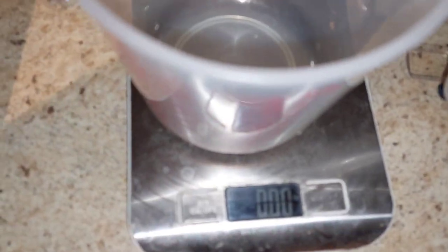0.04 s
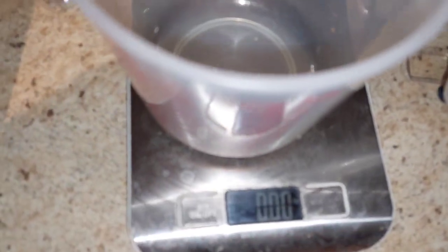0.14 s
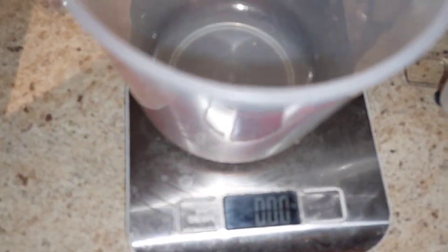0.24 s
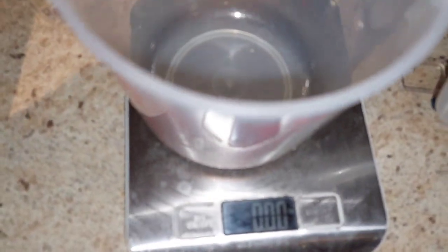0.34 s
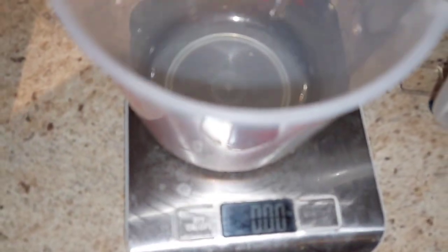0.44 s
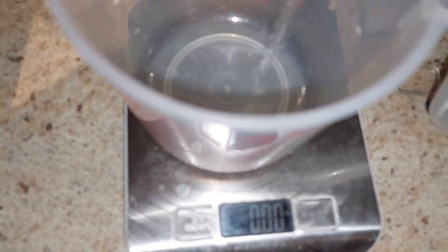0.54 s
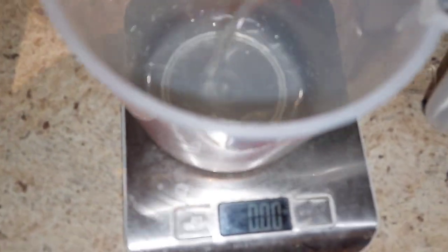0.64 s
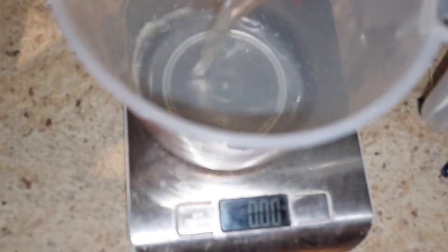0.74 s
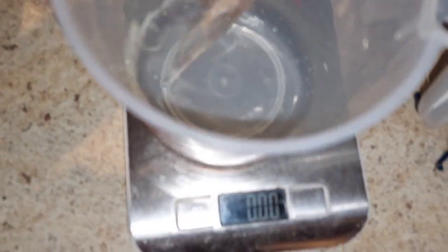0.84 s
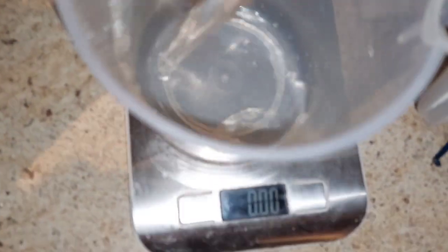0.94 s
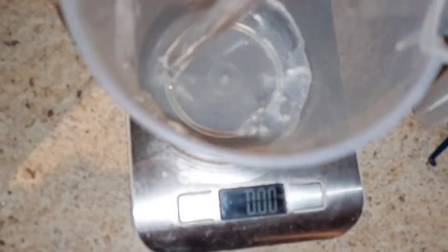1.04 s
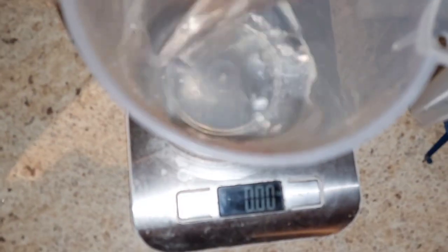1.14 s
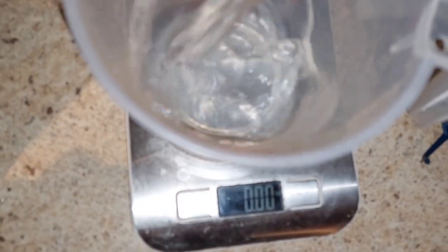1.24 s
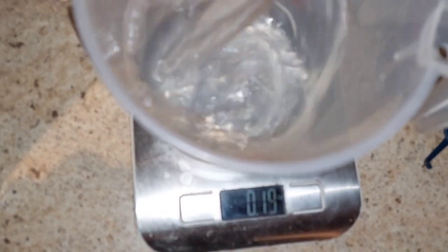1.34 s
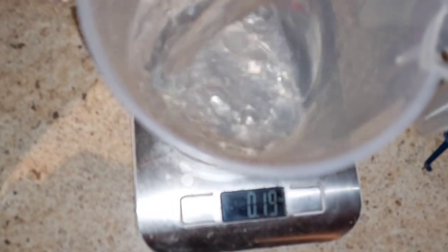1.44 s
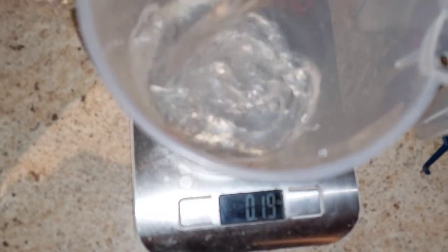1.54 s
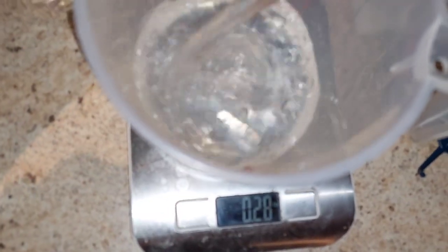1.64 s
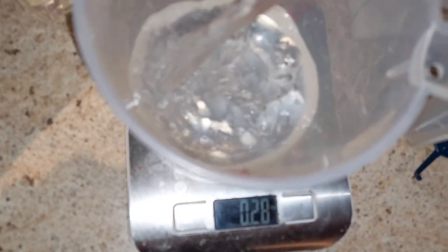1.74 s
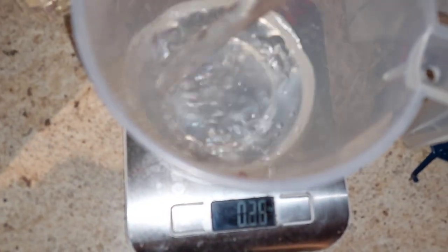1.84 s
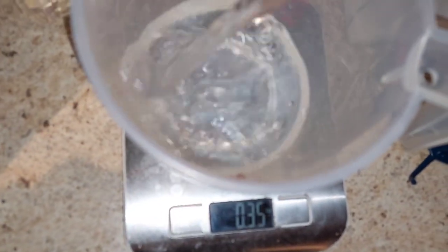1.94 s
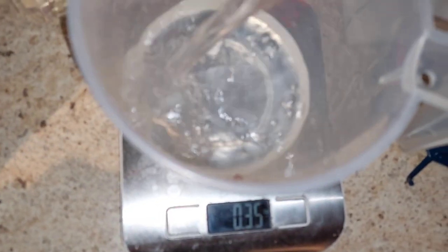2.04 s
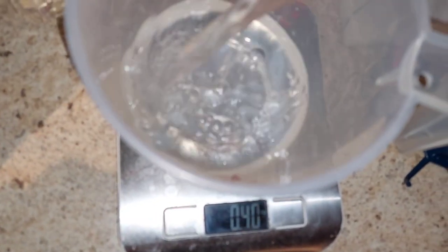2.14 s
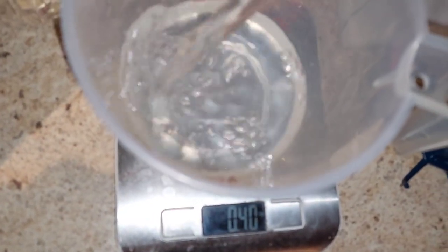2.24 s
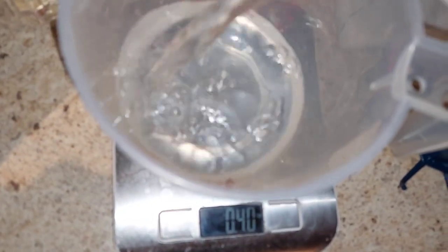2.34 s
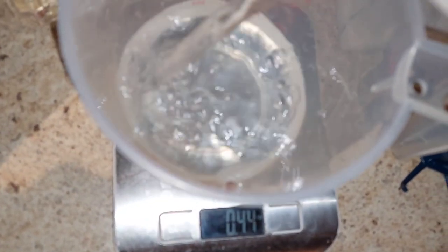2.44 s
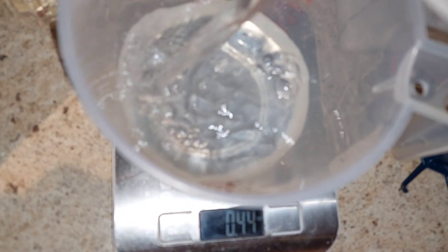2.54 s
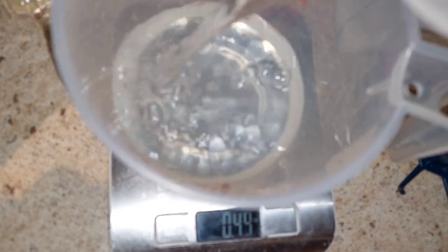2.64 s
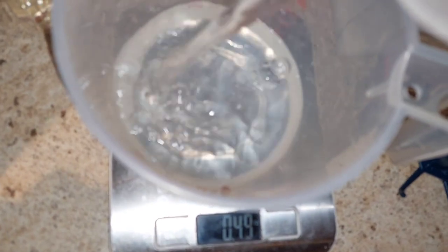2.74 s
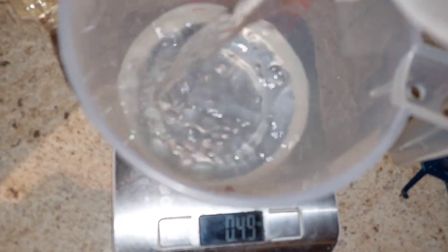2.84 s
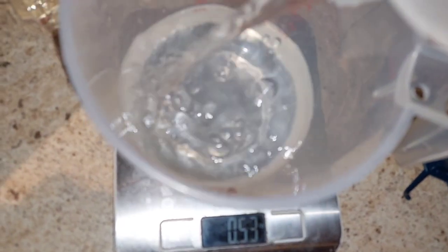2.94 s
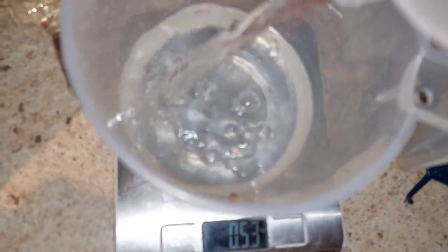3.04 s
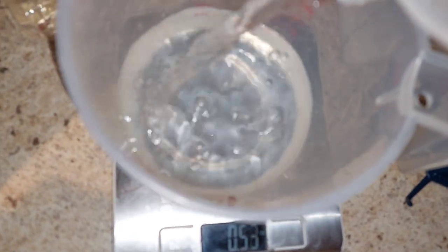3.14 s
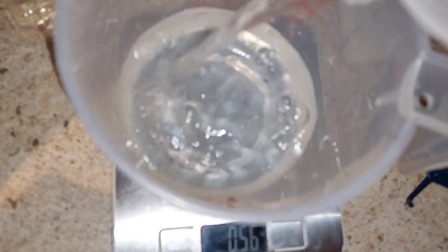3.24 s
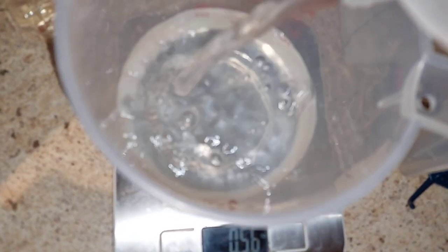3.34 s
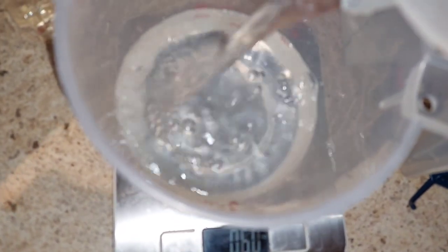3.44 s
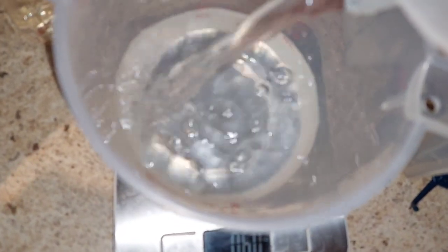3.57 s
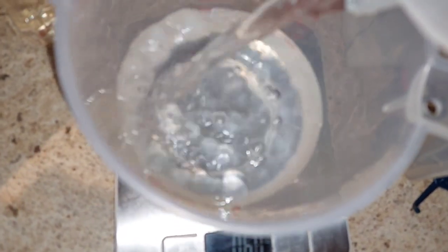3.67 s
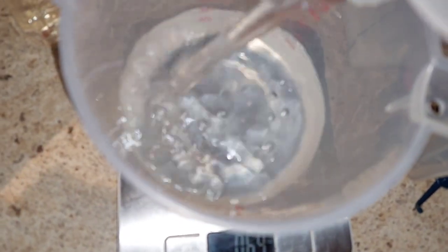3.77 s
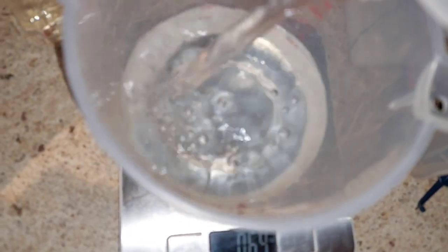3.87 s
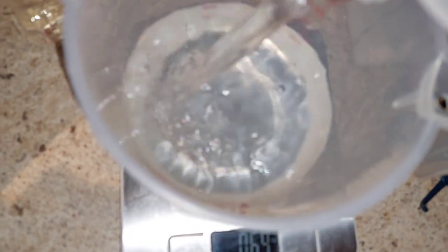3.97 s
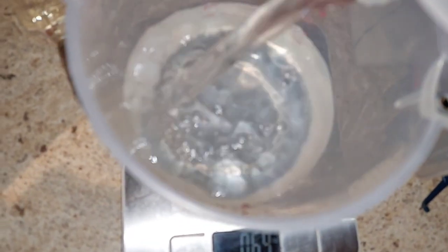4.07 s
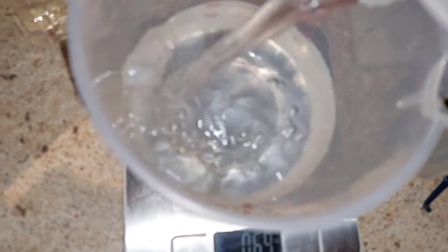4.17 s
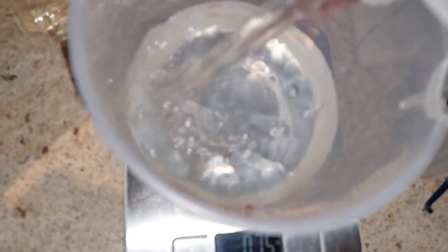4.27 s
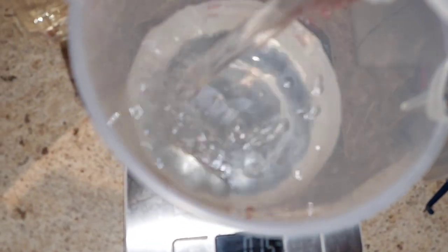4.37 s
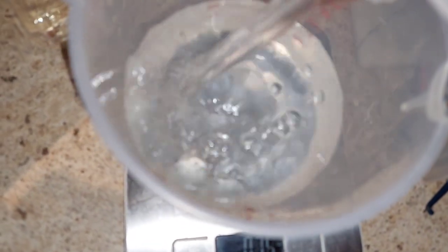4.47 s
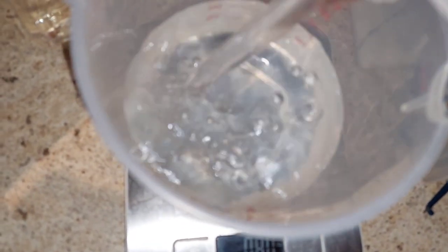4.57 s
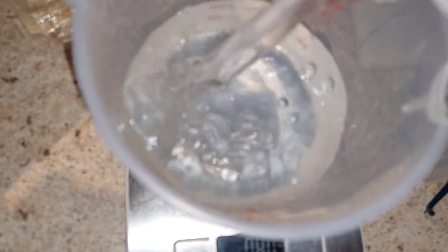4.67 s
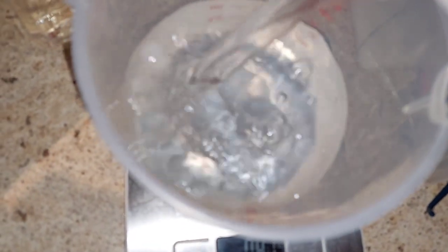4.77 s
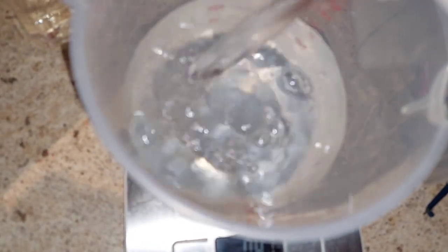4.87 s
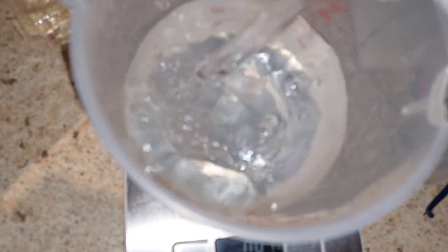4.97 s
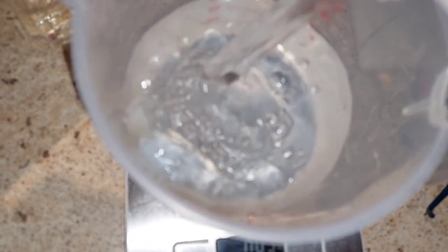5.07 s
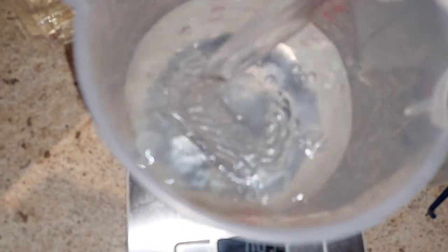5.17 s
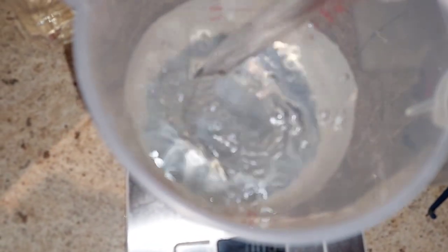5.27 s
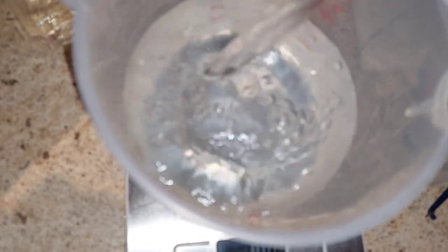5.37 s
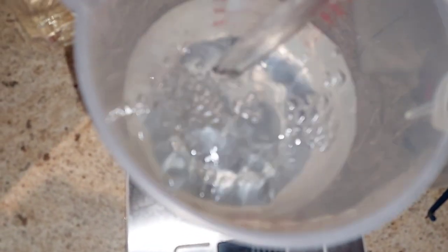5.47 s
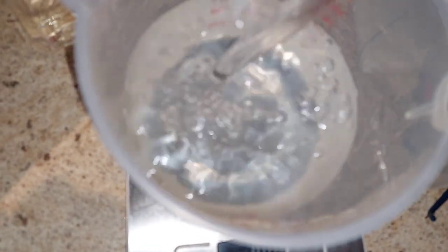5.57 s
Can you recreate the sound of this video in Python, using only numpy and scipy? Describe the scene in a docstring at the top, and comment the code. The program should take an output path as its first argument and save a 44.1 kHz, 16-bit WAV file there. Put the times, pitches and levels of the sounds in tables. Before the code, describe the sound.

Water drops rap on a plastic jug's bare base, then a stream pours in with a burst of splashing, a round gulp, and bubbly gurgling over faint hum.

```python
"""Water poured into a plastic jug

Drops rap on the bare base (damped modes), then a stream gurgles, splashes and sprays (swarms of ringing
bubbles over filtered noise). Glugs, sloshes and a big gulp (swelling, dying sines with noise slaps) stand out;
droplets tick and spatter (short pings, noise bursts). The water echoes in the jug and the room (decaying noise
tails). A motor hums (wavering sines) over room air (shaped noise)."""
import sys
import numpy as np
from scipy import signal
from scipy.fft import rfft, irfft
from scipy.io import wavfile
from scipy.ndimage import uniform_filter1d

SR = 44100
rng = np.random.default_rng(int(sys.argv[2]) if len(sys.argv) > 2 else 0)


def wav_out(sig):
    """Save sig, one row per channel (or a flat mono array), as 16-bit PCM at SR to the path in sys.argv[1]."""
    wavfile.write(sys.argv[1], SR, np.round(np.clip(np.atleast_2d(sig).T, -1, 1) * 32767).astype(np.int16))


N = 247401
TIME = np.arange(N) / SR

# motor partials: (frequency [Hz], level [dB])
HUM_PARTIALS = [(117.8, -55.5), (176.5, -69.5), (249.5, -62.5), (270.3, -71), (294, -69), (414.2, -76)]
# motor's strongest overtone: (time [s], level [dB])
DRONE_LEVEL = [(0.0, -55.5), (2.2, -53.5), (3.5, -57.5), (4.3, -72), (4.62, -62.5), (5.61, -56)]
# room air spectrum: (frequency [Hz], relative level [dB])
AIR_SPECTRUM = [(25, -17), (45, -11), (62, -0.5), (140, -0.5), (170, 3), (200, -4), (260, 8.5), (320, 5),
                (400, -4), (490, -0.5), (600, -14.5), (850, -17.5), (1300, -32), (3000, -37.5), (5800, -44),
                (7500, -37.5), (15000, -43.5)]
# hiss before the first drops: (centre [Hz], width [Hz], level [dB])
FIRST_HISS_BANDS = [(1840, 310, -77), (5030, 920, -81)]
# stream's large, middling and tiny bubbles: (time [s], gurgle [dB], splash [dB], spray [dB])
POUR_LEVELS = [(0.6, -73, -91, -77), (0.69, -62, -74, -68), (0.72, -64, -63, -68), (0.81, -72, -69, -68),
               (0.88, -84, -76, -74), (1.05, -86, -83, -75), (1.18, -75, -75.5, -69.5),
               (1.23, -74, -66.5, -59.5), (1.275, -66, -65, -64), (1.3, -62, -55, -55),
               (1.33, -57, -49.5, -45), (1.58, -58, -51, -48.5), (1.72, -49.5, -49.5, -56.5),
               (1.785, -61.5, -57.5, -56.5), (1.9, -70, -57, -62), (2.09, -58.5, -57.5, -60.5),
               (2.16, -53.5, -59, -64), (2.24, -57.5, -57.5, -65.5), (2.31, -68, -62, -65),
               (2.46, -58.5, -62, -74), (2.54, -61.5, -63.5, -68), (2.6, -59, -59, -65.5),
               (2.72, -67.5, -59.5, -63.5), (3.1, -67, -63, -71), (3.65, -65, -64, -65.5),
               (4.0, -62, -63, -67.5), (4.4, -65.5, -65, -68), (4.8, -61, -60.5, -65),
               (5.13, -69.5, -65.5, -66.5), (5.61, -66, -68, -64)]
# stream plunging harder or thinning: (time [s], level relative to the steady pour [dB])
STREAM_SURGES = [(2.93, 2), (3.06, -2), (3.339, 3), (3.62, 5.5), (3.85, -2.5), (3.99, -5.5), (4.47, 1),
                 (4.68, -1.5), (4.99, -1.5), (5.06, 6.5), (5.15, -6), (5.219, 11), (5.31, 3), (5.441, -6.5)]
# favoured pitch of the large bubbles: (time [s], pitch [Hz])
FAVOURED_PITCH = [(1.3, 650), (1.9, 735), (2.17, 1180), (2.31, 710), (2.47, 840), (2.6, 1010), (2.95, 760),
                  (3.8, 910), (4.2, 1280), (5.6, 1110)]
# large bubbles, strength by pitch: (pitch [Hz], level [dB])
GURGLE_SPECTRUM = [(600, 6), (750, 3), (950, -7), (1200, 7.5), (1500, 7.5)]
# middling bubbles, strength by pitch: (pitch [Hz], level [dB])
SPLASH_SPECTRUM = [(1500, 3.5), (2200, 3), (3000, 2), (4000, 7), (5000, 3)]
# tiny bubbles, strength by pitch: (pitch [Hz], level [dB])
SPRAY_SPECTRUM = [(5000, -5.5), (6800, -13.5), (8500, -5.5), (12000, -9), (15000, -1)]
# resonances of the jug with water in it: (frequency [Hz], width [Hz], level [dB])
JUG_RESONANCES = [(798, 190, 5.5), (1155, 66, 4.5), (1980, 180, 9.5), (3290, 650, 4.5), (3930, 130, 3)]
# drops on the bare base: (time [s], level [dB], crack level relative to the drop [dB])
BASE_RAPS = [(0.6285, -22.5, -37.5), (0.646, -22.5, -33.5), (0.663, -35, -28), (0.675, -50, -14),
             (0.682, -59, -6), (0.7005, -25, 10)]
# modes of the base: (frequency [Hz], level [dB], t60 [s])
BASE_MODES = [(611, -3.5, 0.042), (876, -2, 0.0039), (1090, -16.5, 0.033), (1540, -5, 0.015),
              (2620, -0.5, 0.0069), (1900, -17, 0.0069), (2910, -14, 0.016), (3160, 0.5, 0.0088),
              (3590, -1, 0.0092), (4340, -3, 0.0066), (5600, -6.5, 0.0038)]
# loudest flung droplets: (time [s], level [dB], pitch [Hz])
DROPLET_TICKS = [(0.754, -31, 13400), (0.788, -34, 12300), (0.805, -31.5, 8060), (0.8286, -40, 13000),
                 (0.8403, -40, 4780), (0.92, -42, 13100), (0.945, -35, 13800), (0.9605, -47, 2100),
                 (1.0792, -40, 4240), (1.1077, -38, 5400), (1.1227, -43, 5540), (1.1472, -40.5, 6200),
                 (1.154, -41, 14100), (1.1685, -34, 13700), (1.17, -46, 3320), (1.1982, -36.5, 10800),
                 (1.201, -45, 3070), (1.2301, -29.5, 4700), (1.2845, -38, 5170), (1.3103, -28, 3830),
                 (1.38, -25.5, 3100), (1.4331, -20.5, 2830), (1.4416, -32, 5600), (1.467, -18, 8500),
                 (1.4737, -12.5, 10270), (1.4765, -23, 3710), (1.4858, -24, 12100), (1.5158, -25.5, 5030),
                 (1.689, -30, 8000), (1.716, -18, 8840), (1.73, -24.5, 4670), (1.8, -32.5, 2110),
                 (1.893, -38, 4390), (1.9613, -34.5, 4330), (2.016, -37, 2390), (2.1314, -39, 4900),
                 (2.1897, -44, 1690), (2.356, -41.5, 7150), (2.5365, -34, 12300), (2.628, -35, 3670),
                 (2.6797, -36.5, 3680), (2.805, -34.5, 8300), (3.039, -39, 4070), (3.2713, -37.5, 3300),
                 (3.493, -44, 8900), (3.541, -32, 14000), (3.5739, -35, 13300), (3.604, -32, 8000),
                 (3.728, -33.5, 12400), (3.762, -28, 12700), (3.8297, -35.5, 3600), (4.0912, -31.5, 12300),
                 (4.145, -20, 10500), (4.215, -36, 3980), (4.238, -31, 14600), (4.2892, -16, 14700),
                 (4.2916, -35.5, 3900), (4.359, -40, 7300), (4.377, -45, 12000), (4.5063, -33, 10800),
                 (4.648, -38.5, 3960), (4.781, -30, 4560), (4.9507, -42, 5340), (4.9641, -35.5, 4030),
                 (4.9683, -21, 10150), (5.0084, -26, 10100), (5.1862, -29, 9300), (5.1967, -25.5, 8100),
                 (5.206, -35.5, 3800), (5.339, -35, 13000), (5.371, -38.5, 4460), (5.477, -38, 4500),
                 (5.552, -35, 6650)]
# spray bursts against the wall: (time [s], level [dB])
SPATTER_BURSTS = [(1.222, -37), (1.2505, -43), (1.2835, -33), (1.309, -37), (1.574, -34), (2.128, -50),
                  (2.679, -38.5), (2.806, -47), (3.153, -45), (3.413, -36), (3.574, -46), (3.656, -34.5),
                  (3.728, -44.5), (3.749, -39.5), (3.777, -35), (4.36, -41), (4.511, -34), (4.569, -46),
                  (4.8875, -38.5), (4.907, -38.5), (5.216, -42), (5.253, -39), (5.287, -37)]
# large bubbles pinching off: (time [s], level [dB], pitch [Hz], length [s], slap level [dB])
GLUG_BUBBLES = [(1.25, -47, 1410, .005, -69), (1.325, -35, 1210, 0.0047, -62),
                (1.347, -33, 670, 0.0036, -49), (1.378, -40, 606, 0.026, -68),
                (1.517, -33, 736, 0.0053, -42), (1.602, -47, 750, 0.0073, -55),
                (1.645, -37, 1156, 0.0064, -44), (1.711, -31, 740, 0.005, -56),
                (1.731, -33, 1210, 0.0059, -59), (1.752, -33.5, 810, 0.0064, -51),
                (1.7975, -35.5, 686, 0.0073, -53), (1.955, -48, 730, 0.0059, -67),
                (2.125, -35, 1230, 0.0029, -47), (2.129, -44, 827, 0.011, -54),
                (2.167, -42, 1220, 0.0091, -59), (2.1892, -30, 1194, 0.0053, -52),
                (2.207, -40, 875, 0.0058, -54), (2.257, -38, 680, 0.011, -49),
                (2.306, -46, 780, 0.016, -72), (2.33, -37, 720, 0.012, -77), (2.359, -40.5, 740, .006, -76),
                (2.384, -36, 790, 0.0041, -61), (2.428, -46, 756, 0.0066, -60),
                (2.45, -35.5, 730, 0.016, -69), (2.4575, -34, 736, 0.022, -76),
                (2.494, -42, 835, 0.0044, -75), (2.561, -36, 1330, 0.0043, -62.5),
                (2.581, -36, 1150, 0.0047, -70), (2.594, -37, 1120, 0.0027, -67),
                (2.617, -38, 850, 0.0061, -62), (2.678, -42, 860, 0.011, -50),
                (2.708, -49, 780, 0.011, -52), (2.745, -50, 1140, 0.0055, -56),
                (2.808, -55, 1180, 0.0038, -51.5), (2.917, -40, 733, 0.0082, -45),
                (2.928, -37, 730, 0.017, -49), (3.154, -47.5, 773, 0.014, -51),
                (3.247, -48.5, 1210, 0.0036, -59), (3.33, -56, 1190, .005, -51.5),
                (3.4134, -38, 766, 0.0073, -46.5), (3.573, -41, 1250, 0.0041, -56),
                (3.593, -41, 1160, 0.0061, -49), (3.7476, -42, 744, 0.017, -50),
                (3.774, -40, 734, 0.01, -49), (4.066, -52, 800, .007, -50),
                (4.2343, -42, 1280, 0.0055, -48.5), (4.289, -40.5, 1200, 0.011, -57),
                (4.358, -32.5, 1220, 0.0077, -44.5), (4.377, -50, 1220, 0.0039, -68),
                (4.565, -38, 1190, 0.0055, -51.5), (4.771, -41, 1125, 0.0063, -51),
                (4.887, -39.5, 1060, 0.0044, -56), (4.904, -45, 925, 0.0051, -54),
                (4.968, -48, 900, 0.0056, -53), (5.109, -49, 870, .006, -62), (5.254, -45, 1100, .006, -58),
                (5.281, -58, 1090, 0.0041, -69), (5.34, -46, 890, 0.0063, -74),
                (5.506, -44.5, 1400, 0.0043, -60), (5.559, -34.5, 1340, 0.0022, -56),
                (5.566, -44, 1280, 0.0039, -71)]
# sloshes against the wall: (time [s], level [dB], centre [Hz])
WALL_SLOSHES = [(1.313, -33.5, 1730), (1.363, -26.5, 2650), (1.409, -29.5, 3080), (1.436, -27, 3580),
                (1.477, -25, 3620), (1.51, -24.5, 1910), (1.623, -27, 3570), (1.708, -27.5, 3000),
                (1.722, -24, 3620), (1.939, -34.5, 1960)]

DRONE_HZ, AIR_DB, CUTOFF_HZ = 352.7, -57, 15700
SURGE_RISE_S, SURGE_FALL_S = 0.053, 0.13
CHOP_DB, CHOP_PER_S = 1.56, 51   # the stream breaks into lumps, shaking all bubble sizes together
# share of the full bubble rate at the hardest splash; dB of rate per dB of splash
CHURN_SHARE, CHURN_FOLLOWS = .94, .45
# fused rush, relative to the separate bubbles
GURGLE_WASH_DB, SPLASH_WASH_DB, SPRAY_WASH_DB = -13, -5, -6.5
# droplets that a rap throws across the base
SCATTER_DB, SCATTER_T60_S, SCATTER_GRAIN_DB = -49, 0.24, 4
# droplet ping: decay scale, soft start as a share of it; its crack
TICK_CYCLES, TICK_START_SHARE, TICK_CRACK_T60_S = 3.17, 0.42, 0.0012
SHEET_PEAK_S, SHEET_DB, SHEET_HZ, SHEET_WIDTH_HZ = 0.98, -67.5, 2020, 470
SHEET_SWELL_DB_PER_S, SHEET_FADE_DB_PER_S = 600, 90
SPATTER_T60_S, SPATTER_GRAIN_DB, SPATTER_LOW_HZ, SPATTER_HIGH_HZ = 0.014, 2.5, 2640, 14700
# share of its length in which a glug builds up; relative pitch rise
GLUG_SWELL_SHARE, GLUG_RISE_PER_S, SLAP_T60_S = 0.3, 2.8, 0.046
SLOSH_SPREAD_OCTAVES, SLOSH_CYCLES, SLOSH_SCATTER_S = 0.293, 26, .006   # pitches, ring, mean delay
SLOSH_RUSH_DB, SLOSH_T60_S = -4, 0.029
GULP_S, GULP_DB, GULP_HZ, GULP_SWELL_S, GULP_LENGTH_S = 1.4805, -22, 634, .007, .0205
ROOM_T60_S, ROOM_DB, JUG_T60_S, JUG_DB = 0.22, -8.5, 0.02, -1
TICK_JUG_DB = -4.5   # droplets land high on the wall, so the jug echoes them less


def from_db(db):
    """Decibels to amplitude."""
    return 10 ** (np.asarray(db) / 20)


def rms_one(x):
    """Scale to rms 1."""
    return x / np.sqrt(np.mean(x ** 2) + 1e-20)


def in_time(rows):
    """Each column of a curve at every sample."""
    s, *columns = np.transpose(rows)
    return [np.interp(TIME, s, c) for c in columns]


def at_hz(points, hz):
    """A spectrum read on a log-frequency axis."""
    f, db = np.transpose(points)
    return np.interp(np.log(hz + 1e-9), np.log(f), db)


def cut(x, hz, kind, order=2):
    """Butterworth filter."""
    sos = signal.butter(order, min(hz, .45 * SR), kind, fs=SR, output="sos")
    return signal.sosfilt(sos, x + 1e-18)


def drift(rate):
    """Slow chance with spread 1, rate knots per second."""
    knots = rng.standard_normal(2000)
    return np.interp(TIME * rate, np.arange(len(knots)), knots) * np.sqrt(3 / 2)


def pan(left_db):
    """Channel gains; left exceeds right by left_db."""
    return from_db(np.array([[left_db], [-left_db]]) / 2)


def add(track, s, sound):
    """Mix a short sound into both channels at time s."""
    i = int(np.clip(round(s * SR), 0, N - 1))
    track[:, i:i + sound.shape[-1]] += sound[..., :N - i]


def swell_at(s, rise_s, fall_s):
    """A hump of height 1 that peaks at time s."""
    return np.interp(TIME, [s - rise_s, s, s + fall_s], [0, 1, 0])


def dying(t60, size=4096):
    """Exponential decay."""
    return from_db(-60 * TIME[:size] / max(t60, 1e-4))


def ping(hz, t60, rise=0., size=4096, turn=0., swell=0.):
    """A damped sine building up over swell cycles; rise lifts its pitch, as when a bubble nears the surface."""
    t = TIME[:size]
    build = 1 - np.exp(-t * hz / (swell + 1e-6))
    cycles = hz * t * (1 + rise * np.minimum(t / t60, 1))
    return np.sin(2 * np.pi * cycles + turn) * build * dying(t60, size)


def crack(t60, low_hz, high_hz):
    """The brief broad burst of water hitting something, partly different at each ear."""
    noise = rng.standard_normal((3, 4096))
    burst = (noise[0] + 1.6 * noise[1:]) * dying(t60)
    burst = cut(cut(burst, low_hz, "high"), high_hz, "low")
    return burst * np.sqrt(t60 * SR / 45 / np.sum(burst.mean(axis=0) ** 2))


def grainy(spread_db):
    """A gain that jumps from droplet to droplet; rms 1."""
    return rms_one(from_db(spread_db * np.repeat(rng.standard_normal(128), 32)))


def places(count, spread_db=0.5, spread_turn=0.66):
    """Ear balance and phase of each spot in the jug: gains and phases (count, 2, 1)."""
    draw = rng.standard_normal((count, 2, 1, 1)) * np.array([[1], [-1]])
    gain = from_db(spread_db * draw[:, 0] / 2)
    return gain / np.sqrt(np.mean(gain ** 2, axis=1, keepdims=True)), spread_turn * draw[:, 1]


def narrow_hiss(hz, width_hz):
    """Noise in one narrow band; rms 1."""
    slow_noise = cut(rng.standard_normal((2, N)), width_hz / 2, "low")
    return rms_one(slow_noise * np.sin(2 * np.pi * hz * TIME))


def jug_body(x, plain):
    """The jug lifts the bands round its resonances."""
    out = plain * x
    for hz, width_hz, db in JUG_RESONANCES:
        r = np.exp(-np.pi * width_hz / SR)
        zeros = np.array([1, 0, -1]) * (1 - r * r) / 2
        poles = [1, -2 * r * np.cos(2 * np.pi * hz / SR), r * r]
        out = out + from_db(db) * signal.lfilter(zeros, poles, x)
    return out


def motor():
    """A hum whose partials waver a little, with a strong overtone of changing level."""
    hum = 0
    for hz, db in HUM_PARTIALS:
        level = from_db(db + .8 * drift(8))
        hum = hum + level * np.sin(2 * np.pi * hz * TIME + .45 * drift(5))
    drone_db, = in_time(DRONE_LEVEL)
    drone = from_db(drone_db) * np.sin(2 * np.pi * DRONE_HZ * TIME + 0.19 * drift(3.4))
    return np.sqrt(2) * (pan(10.4) * from_db(-2.5) * hum + pan(5.1) * drone)


def room_air(alike_hz):
    """A dull rush, alike in both ears in the bass and diffuse in the treble."""
    hz = np.fft.rfftfreq(N, 1 / SR)
    mid, side = rfft(rng.standard_normal((2, N))) * from_db(at_hz(AIR_SPECTRUM, hz))
    side = side * np.clip(np.sqrt(hz / alike_hz), 0, 1)
    mid, side = irfft(mid, N), irfft(side, N)
    return from_db(AIR_DB) * pan(0.81) * (mid + side * [[1], [-1]]) / mid.std()


def first_hiss():
    """A faint hiss in narrow noise bands rises and falls as the pour begins."""
    hiss = sum(from_db(db) * narrow_hiss(hz, width_hz) for hz, width_hz, db in FIRST_HISS_BANDS)
    return swell_at(0.524, 0.17, 0.11) * hiss


def bubbles(spectrum, share, cycles, spread_db, clump_db, count, favoured=None, focus_db=9):
    """A swarm of bubbles born in clumps, each ringing some cycles at its own pitch; steady rms 1."""
    when, pitch, luck, damping, size, sign = rng.random((count, 6)).T
    gain, turn = places(count)
    born = (when * N).astype(int)
    low_hz, high_hz = spectrum[0][0], spectrum[-1][0]
    hz = low_hz * (high_hz / low_hz) ** pitch
    t60 = cycles * 2 ** (2 * damping - 1) / hz
    db = at_hz(spectrum, hz) - spread_db * np.log(size + 0.01)
    if favoured is not None:
        # weaker with each octave from the favoured pitch
        db = db - focus_db * np.abs(np.log2(hz / favoured[born]))
    height = from_db(db) * np.sign(sign - .5) / np.sqrt(t60)
    out = np.zeros((2, N))
    for k in np.flatnonzero(luck < share[born]):
        note = ping(hz[k], t60[k], rise=0.011, size=int(t60[k] * SR) + 2, turn=turn[k], swell=0.53)
        add(out, born[k] / SR, height[k] * gain[k] * note)
    out *= from_db(clump_db * drift(50))
    power = np.mean(out ** 2, axis=0)
    power = uniform_filter1d(uniform_filter1d(power, size=2600), size=2600)
    return out / np.sqrt(np.abs(power) + 1e-3 * power.mean())


def wash(spectrum, flutter_db):
    """Countless bubbles too small to tell apart fuse into a fluttering rush; rms 1."""
    hz = np.fft.rfftfreq(N, 1 / SR)
    noise = rng.standard_normal((3, N))
    rush = irfft(rfft(noise[0] + 0.51 * noise[1:]) * from_db(at_hz(spectrum, hz)), N)
    rush = cut(cut(rush, spectrum[0][0], "high"), spectrum[-1][0], "low")
    return rms_one(rush * from_db(flutter_db * drift(90)))


def stirred(settle_s, stir_db):
    """Glugs (more when louder) and the gulp drag a cloud of bubbles down: a gain on the gurgle."""
    cloud = swell_at(GULP_S + 0.0049, 0.037, settle_s)
    for s, db, *_ in GLUG_BUBBLES:
        cloud = cloud + from_db(0.47 * (db + 46.5)) * swell_at(s + 0.0045, 0.018, settle_s)
    return from_db(stir_db * np.minimum(cloud, 1))


def stream():
    """Large, middling and tiny bubbles under the falling stream; a harder splash makes more of them."""
    surge_db = sum(db * swell_at(s, SURGE_RISE_S, SURGE_FALL_S) for s, db in STREAM_SURGES)
    surge_db = surge_db + CHOP_DB * drift(CHOP_PER_S)
    gurgle_db, splash_db, spray_db = in_time(POUR_LEVELS) + surge_db
    share = CHURN_SHARE * from_db(CHURN_FOLLOWS * (splash_db - splash_db.max()))
    favoured, = in_time(FAVOURED_PITCH)
    flowing = np.interp(TIME, [.61, .65], [0, 1])

    gurgle = bubbles(GURGLE_SPECTRUM, share, cycles=24, spread_db=1.2, clump_db=3.5, count=3600,
                     favoured=favoured, focus_db=10.5)
    gurgle = gurgle + from_db(GURGLE_WASH_DB) * wash(GURGLE_SPECTRUM, flutter_db=2)
    gurgle = cut(cut(jug_body(gurgle, plain=0.98), 510, "high", order=4), 3800, "low")
    gurgle = rms_one(gurgle) * from_db(gurgle_db + 1.5) * stirred(settle_s=0.039, stir_db=4)

    splash = bubbles(SPLASH_SPECTRUM, share, cycles=17, spread_db=3.5, clump_db=2.0, count=9500)
    splash = splash + from_db(SPLASH_WASH_DB) * wash(SPLASH_SPECTRUM, flutter_db=3.5)
    splash = rms_one(cut(jug_body(splash, plain=2.2), 830, "high")) * from_db(splash_db + 3.5)

    spray = bubbles(SPRAY_SPECTRUM, share, cycles=12.3, spread_db=4.5, clump_db=4.0, count=6000)
    spray = spray + from_db(SPRAY_WASH_DB) * wash(SPRAY_SPECTRUM, flutter_db=7.0)
    spray = rms_one(cut(spray, 1800, "high")) * from_db(spray_db + 4.5)
    return flowing * (gurgle + splash + spray)


def raps():
    """Drops strike the dry plastic base, set its modes ringing and scatter into a brief spatter."""
    out = np.zeros((2, N))
    base = sum(from_db(db) * ping(hz, t60) * (-1) ** k for k, (hz, db, t60) in enumerate(BASE_MODES))
    for s, db, crack_db in BASE_RAPS:
        # a soft drop leaves the high modes quiet
        knock = cut(base, 4500 * from_db(crack_db), "low", order=1)
        impact = from_db(-10.5) * crack(0.0022, 1300, 13000)
        scatter = from_db(SCATTER_DB) * grainy(SCATTER_GRAIN_DB) * crack(SCATTER_T60_S, 2300, 3800)
        add(out, s + 0.00032, from_db(db + 4.0) * (knock + from_db(crack_db) * (impact + scatter)))
    return out


def ticks():
    """Droplets hit with a tiny crack and a short high ping, soft at its start and gone within a few cycles."""
    out = np.zeros((2, N))
    spots = places(len(DROPLET_TICKS), spread_db=2.0, spread_turn=0.3)
    for (s, db, hz), gain, turn in zip(DROPLET_TICKS, *spots):
        cycles = hz * TIME[:4096]
        age = cycles / TICK_CYCLES
        shape = (1 - np.exp(-age / TICK_START_SHARE)) * np.exp(-age ** 2 / 2)
        note = gain * shape / shape.max() * np.sin(2 * np.pi * cycles + turn)
        add(out, s + 0.0008, from_db(db) * (note + crack(TICK_CRACK_T60_S, 0.6 * hz, 1.9 * hz)))
    return cut(out, 1000, "high")


def sheet():
    """A thin film sizzles across the base, breaking into tiny bubbles of nearly one size: narrow noise."""
    swell_db = SHEET_SWELL_DB_PER_S * (SHEET_PEAK_S - TIME)
    fade_db = SHEET_FADE_DB_PER_S * (TIME - SHEET_PEAK_S)
    return from_db(SHEET_DB - np.maximum(swell_db, fade_db)) * narrow_hiss(SHEET_HZ, SHEET_WIDTH_HZ)


def spatters():
    """A handful of fine droplets lands almost at once: a grainy noise burst."""
    out = np.zeros((2, N))
    for s, db in SPATTER_BURSTS:
        burst = crack(SPATTER_T60_S, SPATTER_LOW_HZ, SPATTER_HIGH_HZ)
        add(out, s, from_db(db) * grainy(SPATTER_GRAIN_DB) * burst)
    return out


def glugs():
    """A slap coloured by the jug; the trapped bubble swells, rings with rising pitch and collapses."""
    out, t = np.zeros((2, N)), TIME[:4096]
    spots = places(len(GLUG_BUBBLES), spread_db=1.5, spread_turn=.3)
    for (s, db, hz, length, slap_db), gain, turn in zip(GLUG_BUBBLES, *spots):
        shape = (1 - np.exp(-t / (GLUG_SWELL_SHARE * length))) * np.exp(-(t / length) ** 4)
        cycles = hz * t * (1 + GLUG_RISE_PER_S * t / 2)
        note = gain * shape * np.sin(2 * np.pi * cycles + turn)
        slap = jug_body(crack(SLAP_T60_S, 1150, 1230), plain=1.3)
        add(out, s, from_db(db) * note + from_db(slap_db) * slap)
    return cut(out, 606, "high")


def sloshes():
    """A slosh breaks into a short run of ringing bubbles of about one size, over a brief rush."""
    out = np.zeros((2, N))
    for s, db, hz in WALL_SLOSHES:
        add(out, s, from_db(db + SLOSH_RUSH_DB) * crack(SLOSH_T60_S, 0.87 * hz, 1.0 * hz))
        pitches = hz * 2 ** (SLOSH_SPREAD_OCTAVES * rng.standard_normal(size=9))
        delays = rng.exponential(SLOSH_SCATTER_S, size=9)
        for own_hz, delay, gain, turn in zip(pitches, delays, *places(count=9)):
            note = ping(own_hz, SLOSH_CYCLES / own_hz, rise=0.044, turn=turn, swell=1.8)
            add(out, s + delay, from_db(db - 6) * gain * note)
    return out


def gulp():
    """The stream folds over a big air pocket: it swells into a round plop and thumps the jug softly."""
    t, out = TIME[:4096], np.zeros((2, N))
    shape = (1 - np.exp(-3 * t / GULP_SWELL_S)) * np.exp(-(t / GULP_LENGTH_S) ** 3)
    plop = shape * np.sin(2 * np.pi * GULP_HZ * t * (1 + .8 * t))
    add(out, GULP_S, from_db(GULP_DB) * pan(1) * plop)
    add(out, GULP_S - .006, from_db(-44) * pan(8) * ping(65, .07))
    return out


def echoes(x, t60, low_hz, high_hz, gap, size):
    """Dense dying reflections, different at each ear."""
    tail = rng.standard_normal((2, size)) * dying(t60, size) * (TIME[:size] > gap)
    tail /= np.sqrt(np.sum(tail ** 2, axis=1, keepdims=True))
    tail = cut(cut(tail, low_hz, "high"), high_hz, "low", order=1)
    return signal.oaconvolve(x, tail, axes=1)[:, :N]


def in_jug(water, echo_db):
    """The sound reaches the left side first and stronger, bounces round the jug, then round the room."""
    left, right = water[0], np.pad(water[1], (8, 0))[:N]   # right 8 samples late
    direct = np.array([from_db(4.5) * left - 0.75 * cut(left, 1370, "high", order=1),
                       from_db(-9.5) * right + 0.22 * cut(right, 1500, "high", order=1)])
    # the heaving surface keeps changing the paths inside the jug
    paths = np.array([drift(14) for _ in range(3)])
    paths /= np.sqrt(np.sum(paths ** 2, axis=0))
    inside = sum(echoes(water * path, JUG_T60_S, 1340, 21200, .0005, size=4096) for path in paths)
    room = echoes(water, ROOM_T60_S, 450, 3300, 0.0084, size=SR // 2)
    return direct + from_db(echo_db) * pan(0.1) * inside + from_db(ROOM_DB) * room


def scene():
    """Water in the jug over the motor hum and room air."""
    water = first_hiss() + stream() + raps() + sheet() + spatters() + glugs() + sloshes() + gulp()
    return motor() + room_air(alike_hz=1190) + in_jug(water, JUG_DB) + in_jug(ticks(), TICK_JUG_DB)


def record(dry):
    """The top is cut steeply."""
    return signal.sosfilt(signal.ellip(10, .2, 80, CUTOFF_HZ, fs=SR, output="sos"), dry)


dry = scene()
out = record(dry)
wav_out(out)
```